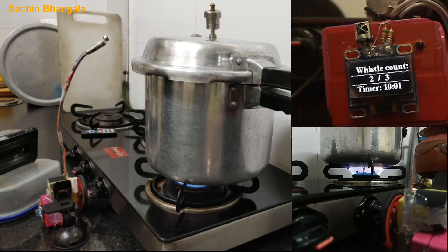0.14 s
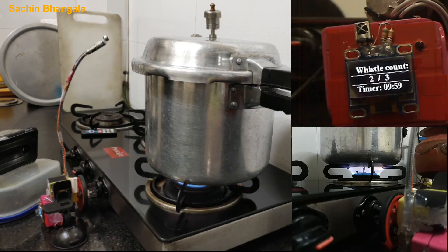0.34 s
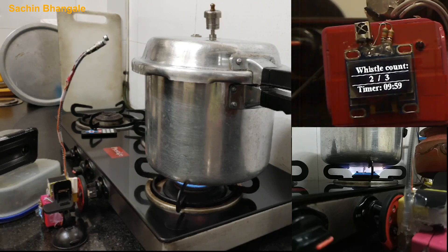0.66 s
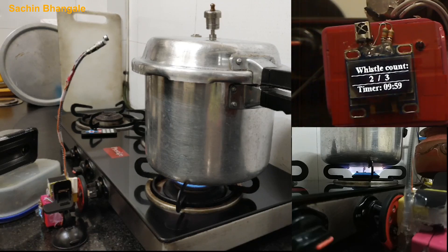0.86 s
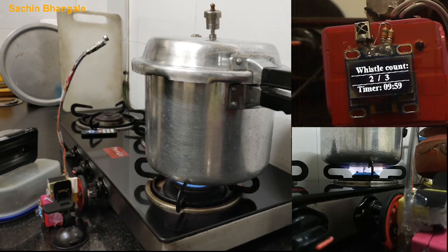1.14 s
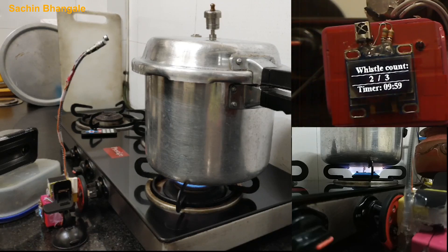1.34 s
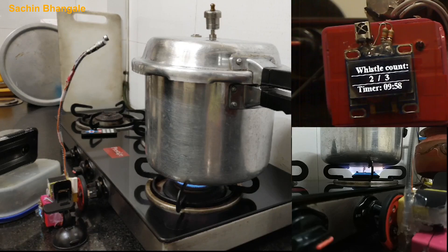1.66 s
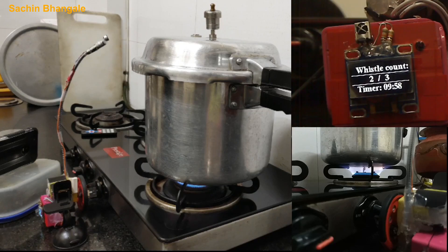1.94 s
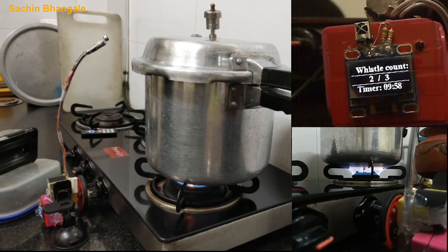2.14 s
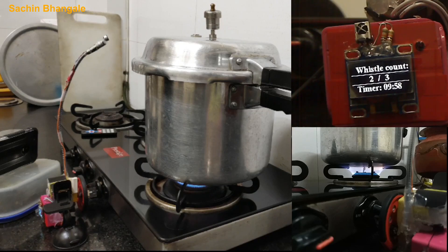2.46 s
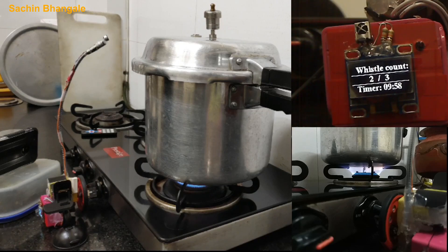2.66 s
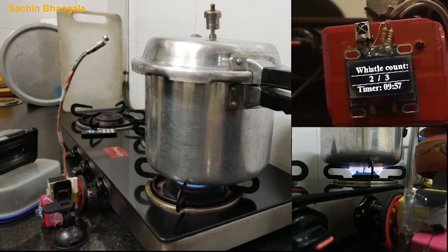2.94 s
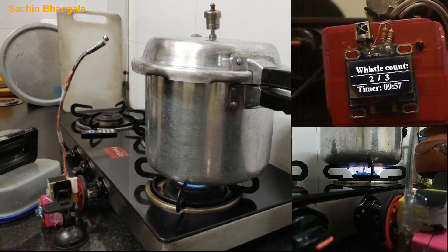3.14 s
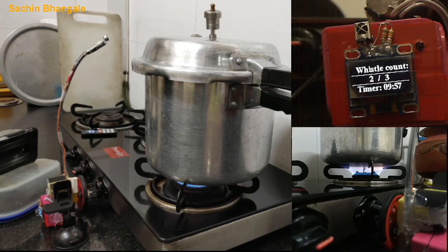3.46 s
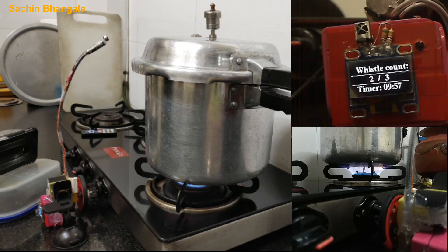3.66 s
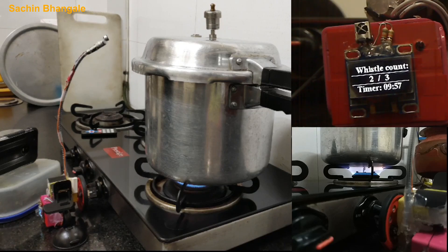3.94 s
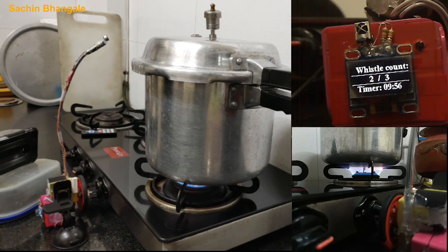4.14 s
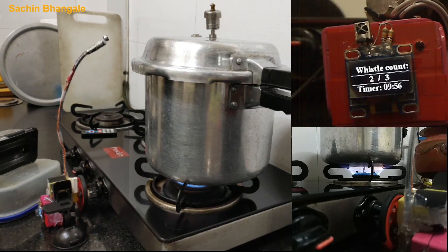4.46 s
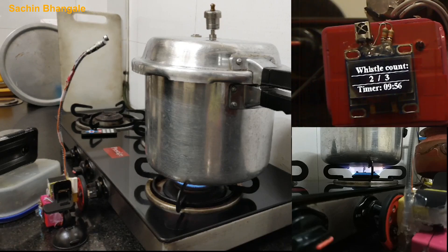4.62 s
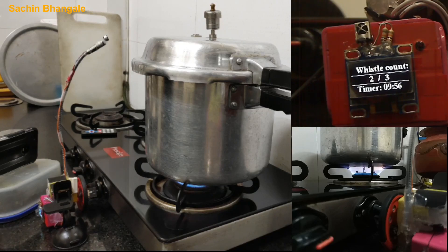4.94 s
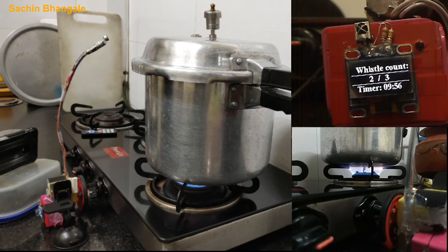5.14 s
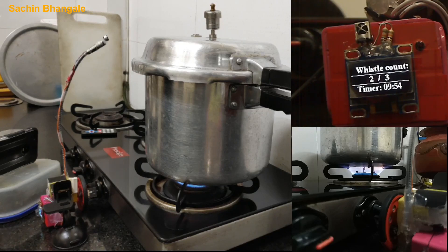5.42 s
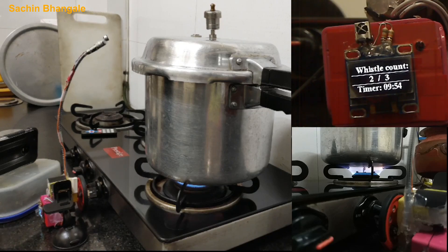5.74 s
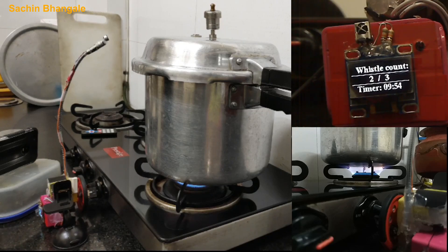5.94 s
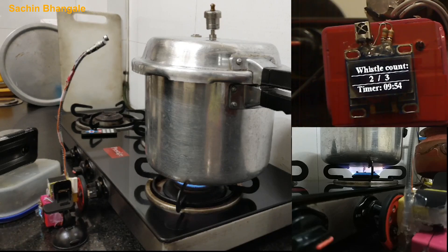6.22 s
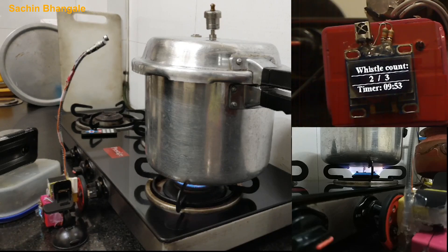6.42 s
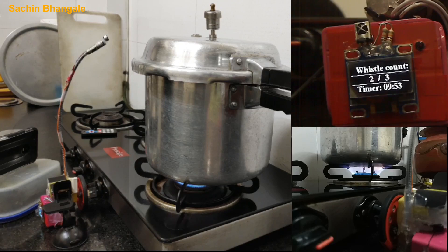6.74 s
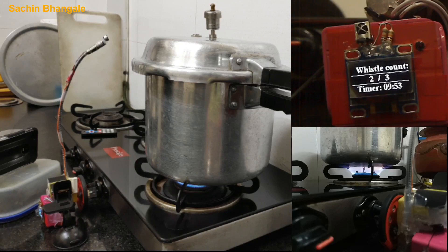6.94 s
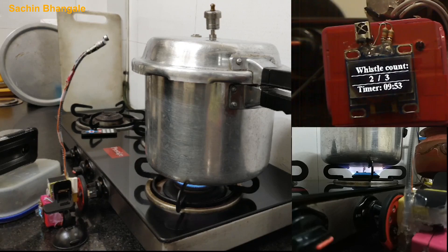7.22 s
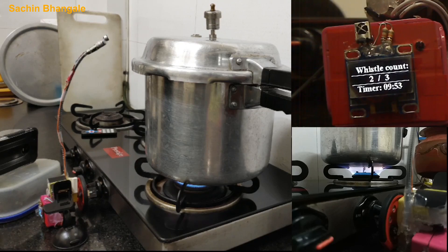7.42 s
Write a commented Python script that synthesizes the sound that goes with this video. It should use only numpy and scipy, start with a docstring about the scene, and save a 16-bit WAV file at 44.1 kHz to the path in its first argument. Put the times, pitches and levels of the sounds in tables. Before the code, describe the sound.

Close to a pressure cooker in a kitchen, a jet of steam hisses loudly and evenly, distorting the microphone into a rough crackle. Brief hollow gulps come at irregular moments over the faint rumble and bubbling of the pot. The hiss holds almost level throughout, then drops away abruptly as the valve closes with a quick cluster of louder gulps.

```python
"""Pressure cooker venting steam

A turbulent jet hisses in many narrow resonances over its own low, lumpy rumble and short, hollow gulps. A few
louder gulps sound as the valve shuts and the hiss dies. The hiss overloads a small, close microphone: its
strongest crests pin the output to the lower rail for an instant, a dense, rasping crackle."""
import sys
import numpy as np
from scipy import signal
from scipy.fft import rfft, irfft
from scipy.io import wavfile

SR = 44100
rng = np.random.default_rng(int(sys.argv[2]) if len(sys.argv) > 2 else 0)


def waveform_to_disk(signal):
    """Save audio, clipped to [-1, 1], as 16-bit WAV at the path in sys.argv[1]."""
    frames = np.transpose(np.atleast_2d(signal))
    scaled = np.clip(frames, -1, 1) * 32767
    samples = np.round(scaled).astype(np.int16)
    wavfile.write(sys.argv[1], SR, samples)


N = 334719
T = np.arange(N) / SR
HZ = np.fft.rfftfreq(N, 1 / SR)


def gain_of(db):
    """Amplitude ratio of a level in decibels."""
    return 10 ** (np.asarray(db) / 20)


def unit_rms(x):
    """Normalisation to an rms of 1."""
    return x / np.sqrt(np.mean(x ** 2) + 1e-20)


def noise(spectrum, lift_db=0):
    """Spectral shaping of white noise: (f, level) points joined over log frequency, plus a lift."""
    hz, db = np.transpose(spectrum)
    shape_db = np.interp(np.log(HZ + 1), np.log(hz), db) + lift_db
    return unit_rms(irfft(rfft(rng.standard_normal(N)) * gain_of(shape_db), N))


def wander(rate_hz):
    """Random modulation: low-passed noise of rms 1."""
    return unit_rms(irfft(rfft(rng.standard_normal(N)) / (1 + (HZ / rate_hz) ** 4), N))


def flow_db(start_db=-18.5, sink_s=7.345, shut_s=7.485):
    """Exponential decay in three stages: the pressure falls, the valve sinks, the valve shuts."""
    sinking, shut = np.maximum(T - sink_s, 0), np.maximum(T - shut_s, 0)
    return start_db - 0.1034 * T - 6 * sinking - 83 * shut  # slopes in dB/s


# Noise spectrum of the steam's low turbulence: f/Hz, relative level/dB
TURBULENCE_SPECTRUM = [(30, -24), (60, -17), (110, -10.5), (170, -8.5), (260, -3), (500, -4), (900, -7.5),
                       (2000, -30)]

def rumble(re_flow_db=-24.5, lump_db=4.0, lump_hz=22):
    """Amplitude-modulated noise: the low, lumpy turbulence of the steam follows the flow."""
    eddies = noise(TURBULENCE_SPECTRUM) * gain_of(lump_db * wander(lump_hz))
    return gain_of(re_flow_db + flow_db()) * unit_rms(eddies)


def bubbles(re_flow_db=-22.5, per_s=40, low_hz=140, high_hz=800, cycles=1.2, spread_db=1.9, pitches=16):
    """Poisson process: small gulps come at random, each a tone pulse under a Gaussian envelope."""
    t = np.arange(-SR // 25, SR // 25) / SR
    out = np.zeros(N)
    for hz in np.geomspace(low_hz, high_hz, pitches):
        sizes = gain_of(spread_db * np.minimum(rng.exponential(1, N), 2))
        events = rng.random(N) < per_s / pitches / SR
        pulse = np.exp(-.5 * (t * hz / cycles) ** 2) * np.sin(2 * np.pi * hz * t)
        out += signal.oaconvolve(sizes * events, pulse, "same")
    return gain_of(re_flow_db + flow_db()) * unit_rms(out)


# Loudest gulps of the pot, the last merging as the valve shuts: t/s, envelope peak level/dB, f/Hz
GULP_PULSES = [(0.071, -22, 958), (0.134, -24, 418), (0.356, -23, 747), (0.390, -23.5, 342),
               (0.814, -23.5, 376), (1.148, -18, 400), (1.325, -21.5, 290), (1.408, -21.5, 180),
               (1.467, -21, 770), (1.720, -22.5, 673), (1.857, -25, 399), (2.174, -24, 986),
               (2.329, -18.5, 135), (3.169, -26, 313), (3.225, -25.5, 139), (3.269, -21, 390),
               (3.403, -20, 270), (3.411, -20, 420), (3.497, -20, 726), (3.656, -22.5, 280),
               (3.660, -21, 540), (3.817, -23, 559), (3.877, -27, 550), (4.458, -17, 151),
               (4.479, -20.5, 190), (4.697, -22.5, 426), (5.156, -24, 162), (5.179, -25, 263),
               (5.226, -25, 248), (5.252, -24.5, 160), (5.358, -27, 115), (6.249, -24.5, 181),
               (6.640, -22, 576), (7.123, -21, 227), (7.254, -24, 252), (7.357, -23, 248),
               (7.485, -26, 650), (7.525, -16, 688), (7.536, -15.5, 1240), (7.549, -14, 1212),
               (7.563, -15.5, 1230), (7.568, -21.5, 620), (7.583, -22, 730)]

def gulps(rise_s=.0043, fade_over_rise=1.2, sag_cycles=.06, roughness=0.48, rough_hz=280):
    """Transient oscillation: each gulp is a few rough cycles that swell and fade as their pitch sags."""
    out = np.zeros(N)
    for (peak_s, db, hz), phase in zip(GULP_PULSES, rng.random(len(GULP_PULSES))):
        rise = rise_s * (400 / hz) ** .12  # lower gulps last longer
        fade = rise * fade_over_rise
        near = slice(*np.searchsorted(T, [peak_s - 4 * rise, peak_s + 4 * fade]))
        t = T[near] - peak_s
        age = t / np.where(t < 0, rise, fade)
        turns = hz * t - sag_cycles * age ** 2 + phase
        out[near] += gain_of(db) * np.exp(-.5 * age ** 2) * np.sin(2 * np.pi * turns)
    return out * (1 + roughness * wander(rough_hz))


def reflections(x, echo_db=-17, reach_s=.025, count=40):
    """Interference: early echoes off tiles and counter put a fine ripple on the spectrum."""
    delays = (rng.random(count) * reach_s * SR).astype(int)
    taps = np.bincount(delays, rng.standard_normal(count)) / np.sqrt(count)
    return x + gain_of(echo_db) * signal.oaconvolve(x, taps)[:N]


# Broadband spectrum of the jet: f/Hz, relative level/dB
JET_SPECTRUM = [(100, -30), (600, -20.5), (1500, -11.5), (2300, -8), (3100, -6), (3800, -2), (4500, -0.5),
                (5600, -1), (6700, -0.5), (7500, -4), (8100, -7.5), (8700, -14), (10000, -30.5)]
# Resonances of the valve and its surroundings: f/Hz, width/Hz before narrowing, lift/dB before scaling
VALVE_RESONANCES = [(3561, 38, 3.3), (3778, 54, 3.3), (3926, 22, 3.2), (4161, 48, 3.6), (4247, 27, 3.7),
                    (4348, 22, 4.7), (4565, 81, 3.2), (4671, 22, 4.3), (4897, 22, 2.8), (4973, 54, 4.7),
                    (5075, 54, 2.9), (5212, 22, 2.4), (5426, 48, 3.2), (5632, 22, 2.4), (5690, 27, 2.7),
                    (5813, 32, 2.7), (5947, 32, 4.6), (6238, 22, 2.5), (6363, 27, 2.7), (6444, 59, 4.9),
                    (6551, 27, 5.1), (6636, 22, 2.7), (6787, 54, 5.6), (6887, 22, 2.6), (7091, 32, 2.8),
                    (7242, 43, 2.9), (7316, 59, 3.5), (7467, 48, 3.5), (7624, 32, 4.2), (7699, 75, 3.3)]

def jet(re_flow_db=1.7, lift_scale=1.4, narrowing=1.5):
    """Resonant filtering: the noise of turbulent steam is lifted at each narrow resonance."""
    lift_db = sum(db * np.exp(-np.log(2) * (2 * narrowing * (HZ - hz) / width) ** 2)
                  for hz, width, db in VALVE_RESONANCES)
    steam = reflections(noise(JET_SPECTRUM, lift_scale * lift_db))
    return gain_of(re_flow_db + flow_db()) * unit_rms(steam)


def scene():
    """Superposition: all sources add at one microphone, alike on both channels."""
    return np.tile(jet() + bubbles() + rumble() + gulps(), (2, 1))


def overload(x, ceiling=0.73, trip=0.31, rail=0.19, stuck_ms=0.2):
    """Saturation rounds the crests; a swing below -trip briefly latches the output to the lower rail."""
    trips = np.diff((x < -trip).astype(float), prepend=0) > 0
    hold = np.clip(stuck_ms * SR / 1000 - np.arange(32), 0, 1)
    stuck = np.minimum(signal.lfilter(hold, 1, trips.astype(float)), 1)
    return (1 - stuck) * ceiling * np.tanh(x / ceiling) - stuck * rail


def record(dry, low_cut_hz=115, high_cut_hz=8200, edge_hz=8950):
    """Band limiting: the overloaded microphone's output loses bass and treble, then meets a steep edge."""
    high_pass = 1 / np.sqrt(1 + (low_cut_hz / (HZ + 1)) ** 7)
    low_pass = 1 / np.sqrt(1 + (HZ / high_cut_hz) ** 50)
    heard = irfft(rfft(overload(dry)) * high_pass * low_pass, N)
    band_edge = signal.firwin(401, edge_hz, window=("kaiser", 9), fs=SR)
    return signal.oaconvolve(heard, band_edge[None], "same")


dry = scene()
out = record(dry)
waveform_to_disk(out)
```